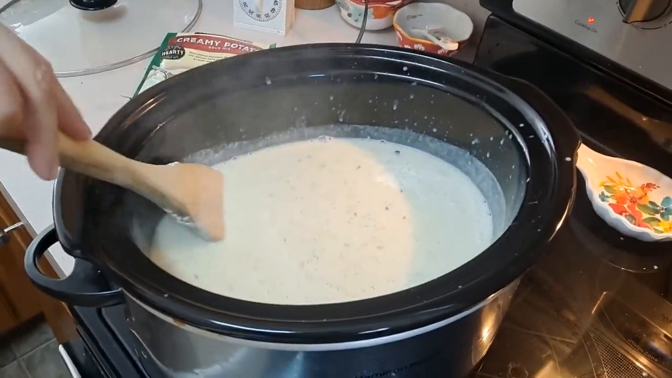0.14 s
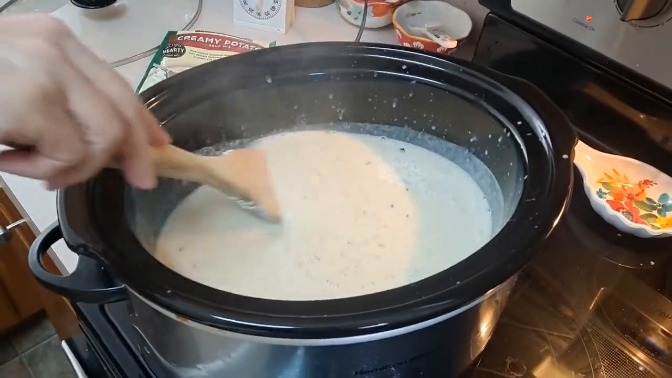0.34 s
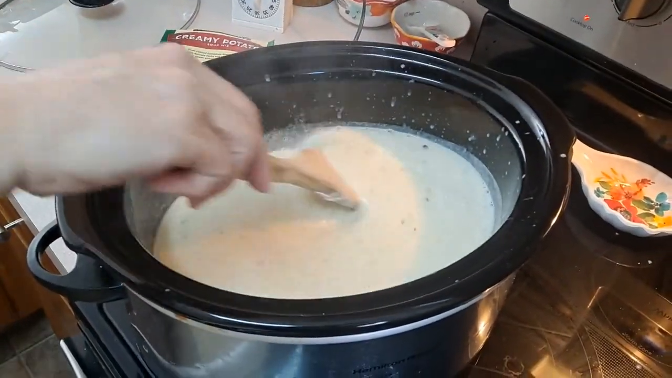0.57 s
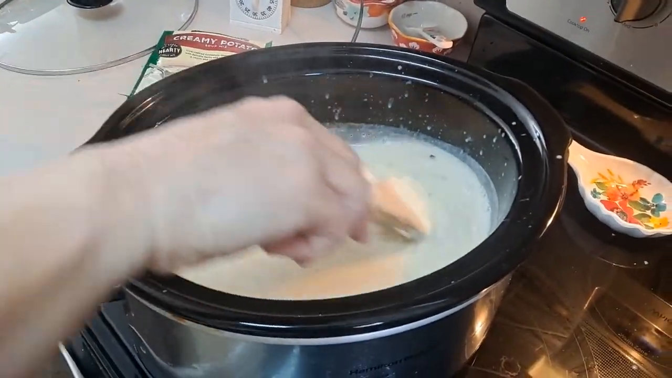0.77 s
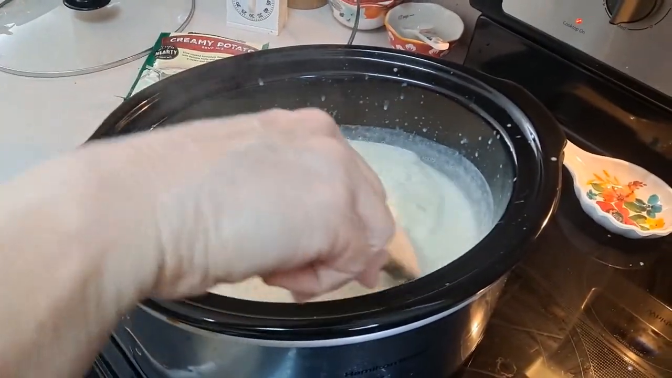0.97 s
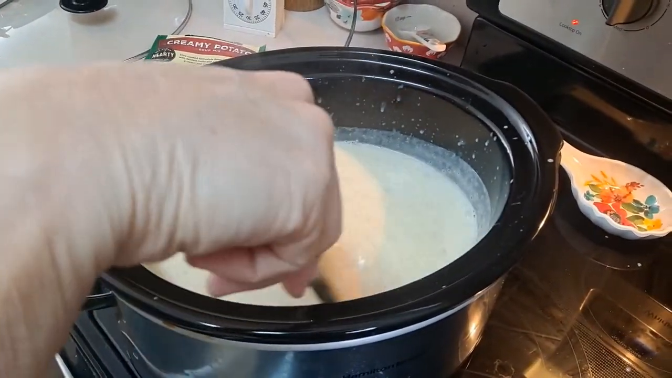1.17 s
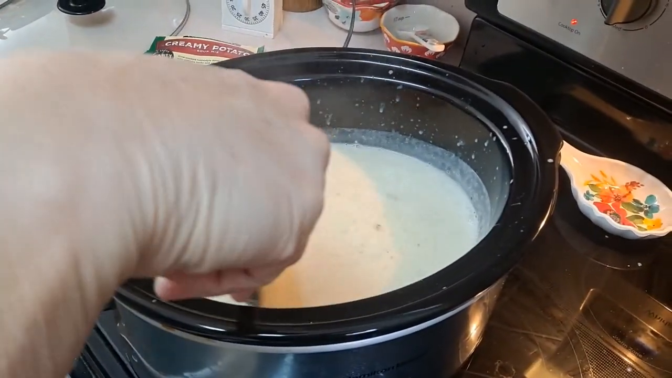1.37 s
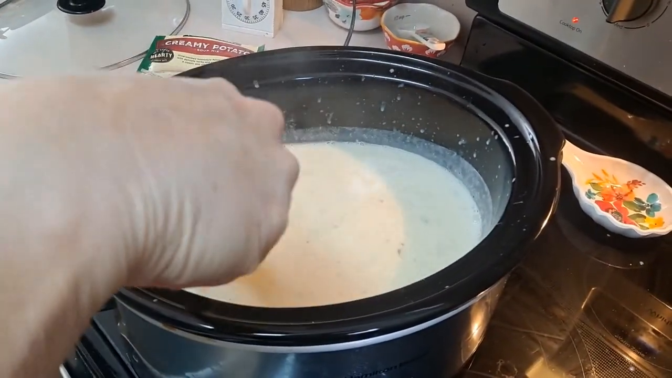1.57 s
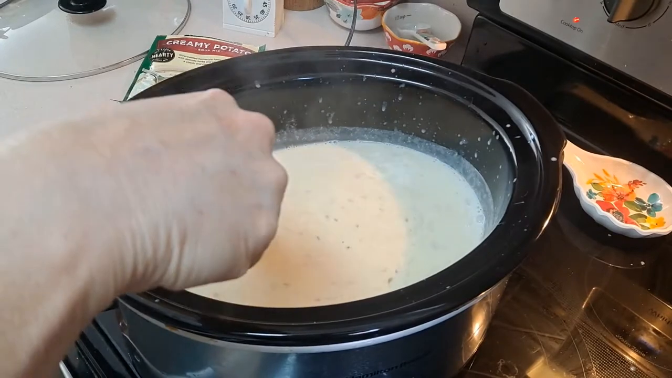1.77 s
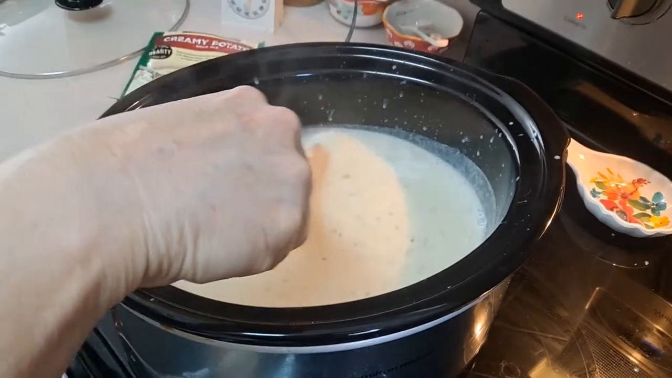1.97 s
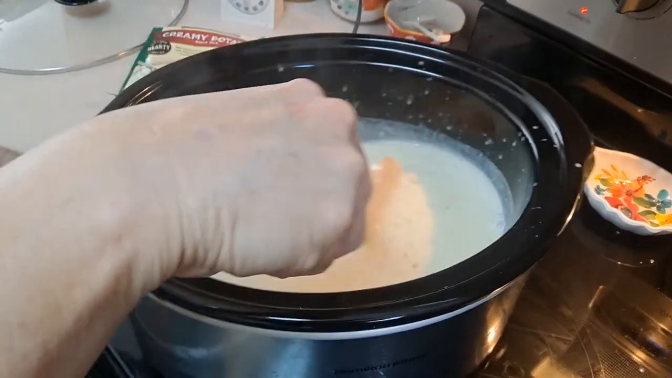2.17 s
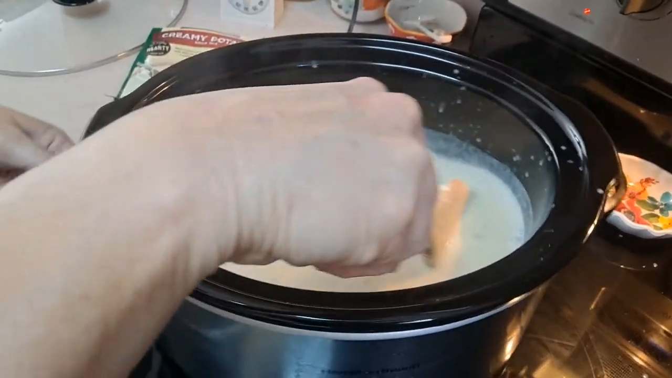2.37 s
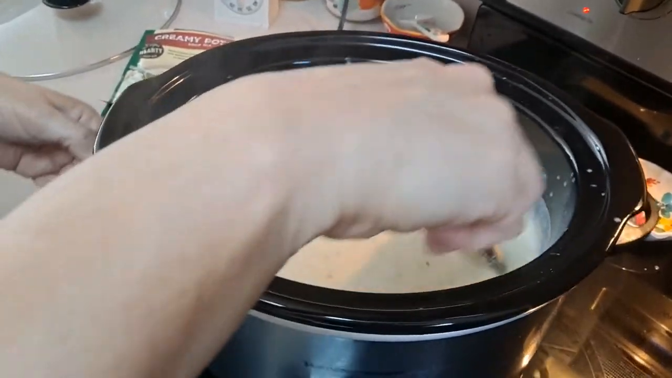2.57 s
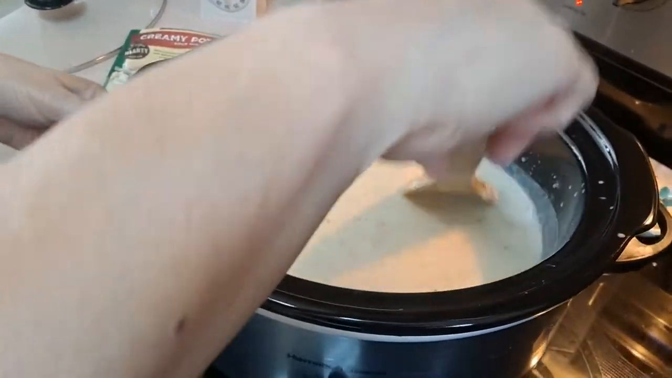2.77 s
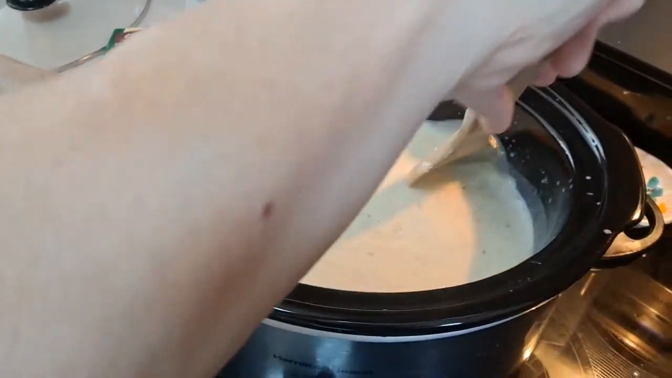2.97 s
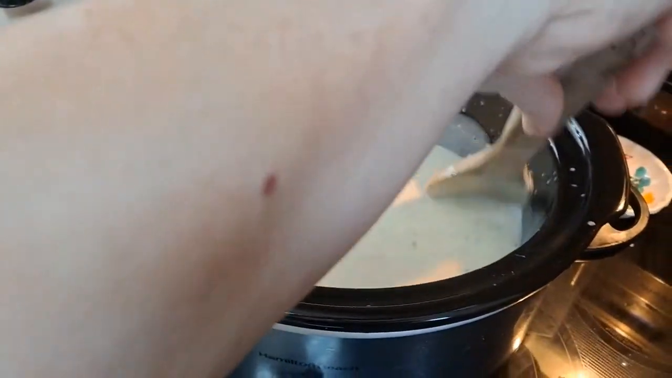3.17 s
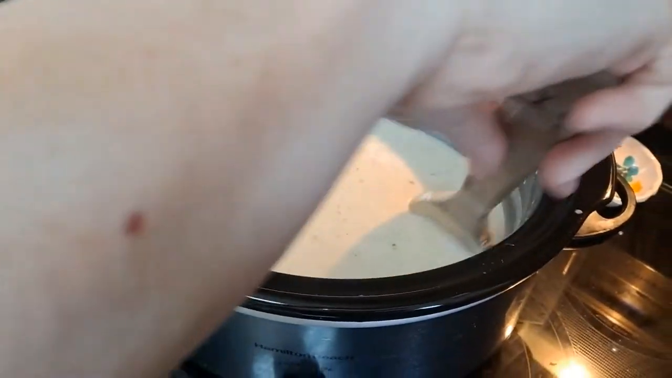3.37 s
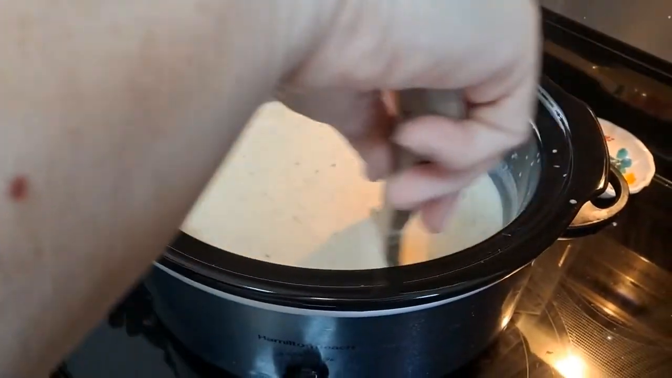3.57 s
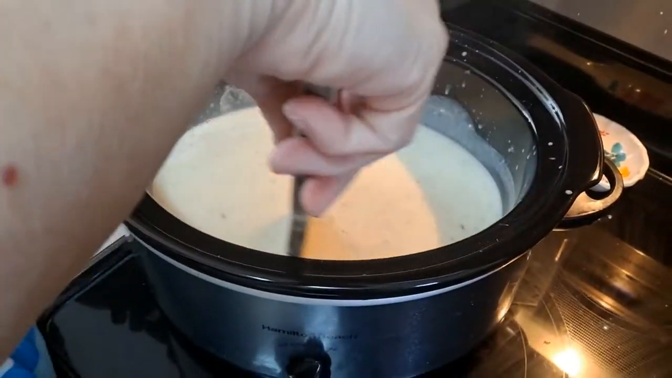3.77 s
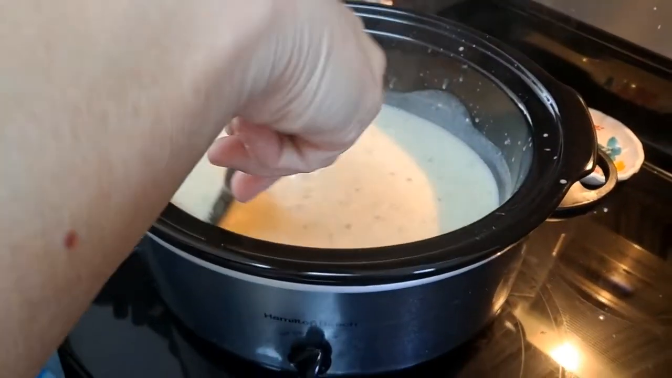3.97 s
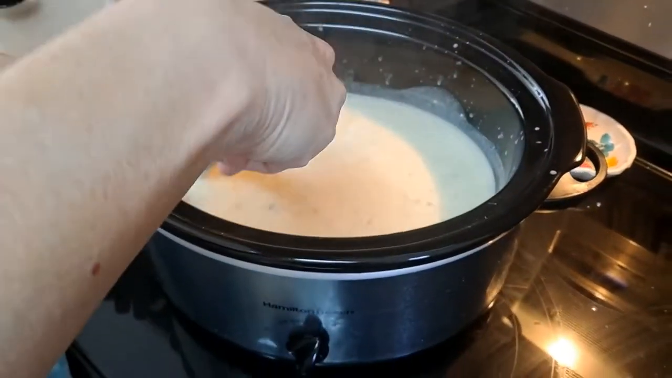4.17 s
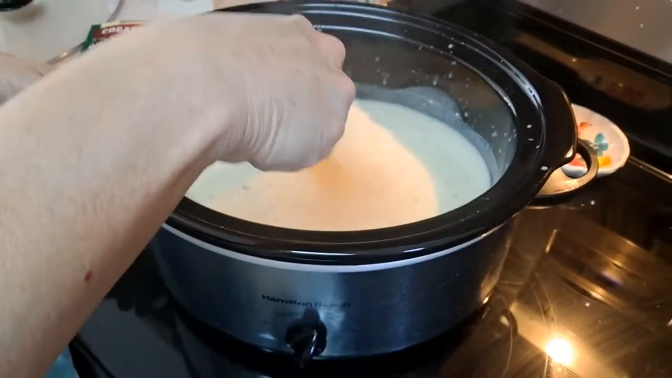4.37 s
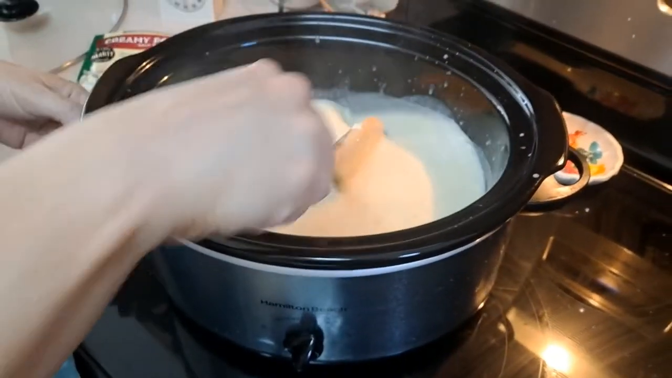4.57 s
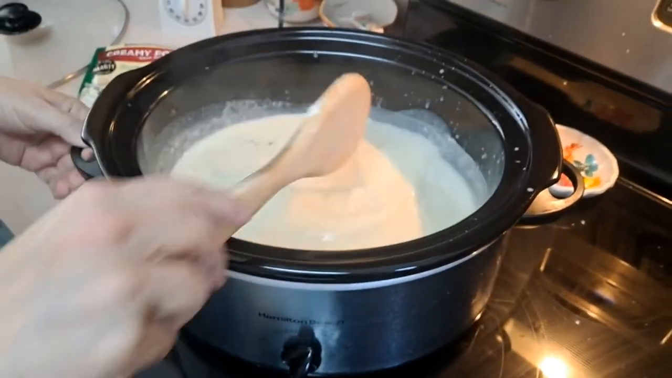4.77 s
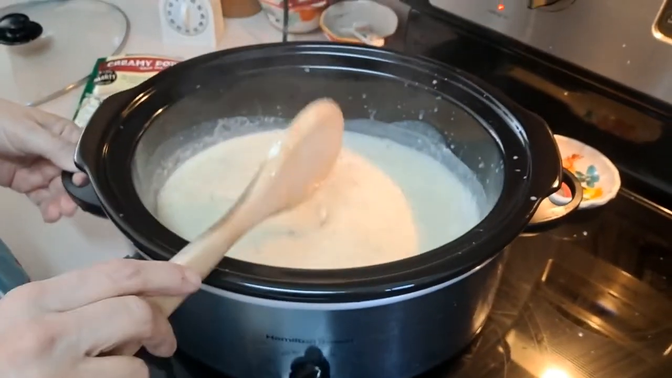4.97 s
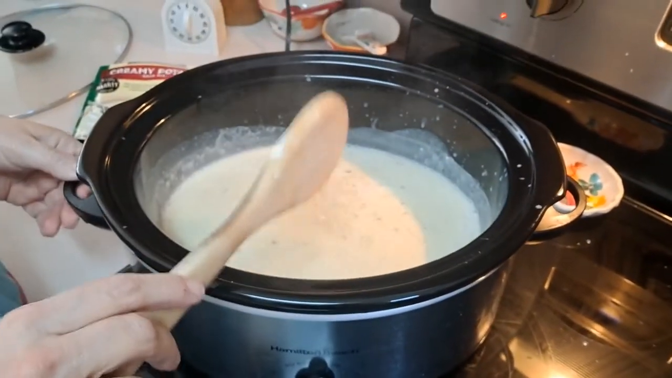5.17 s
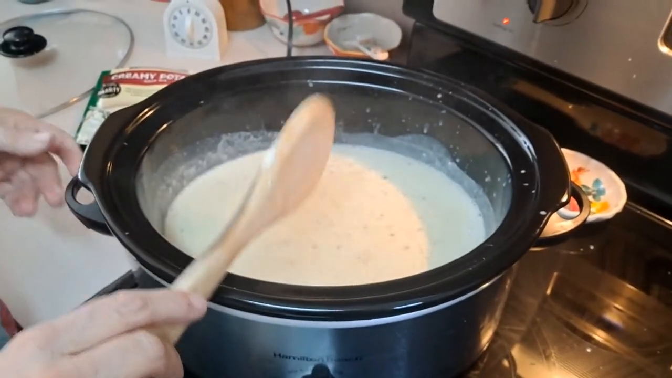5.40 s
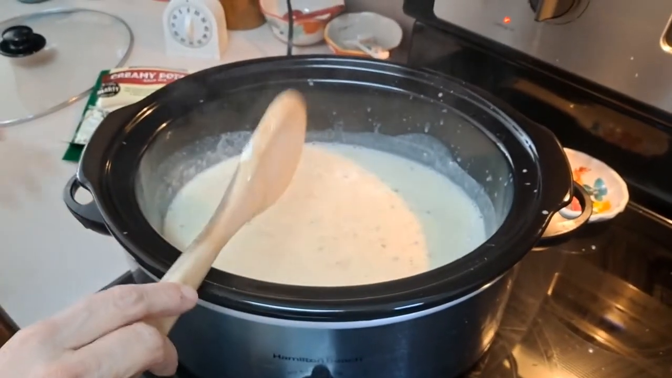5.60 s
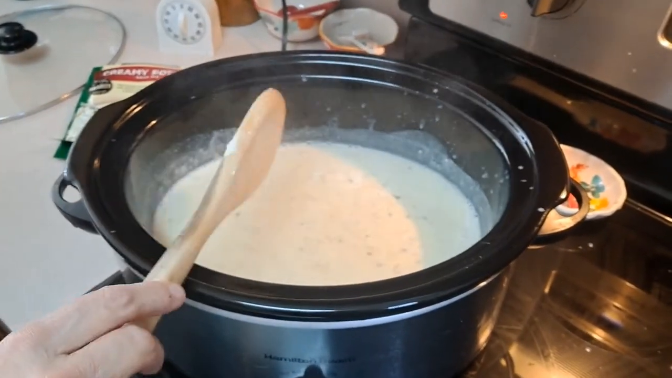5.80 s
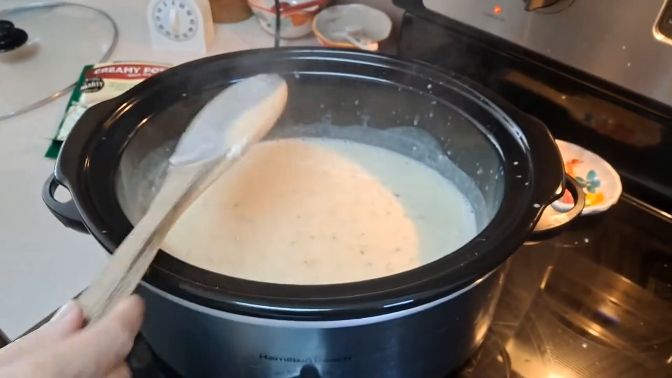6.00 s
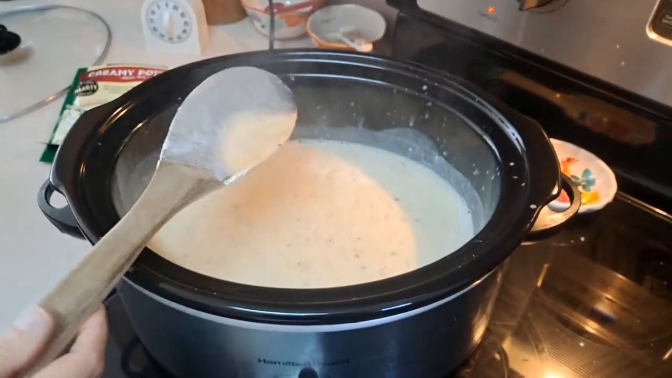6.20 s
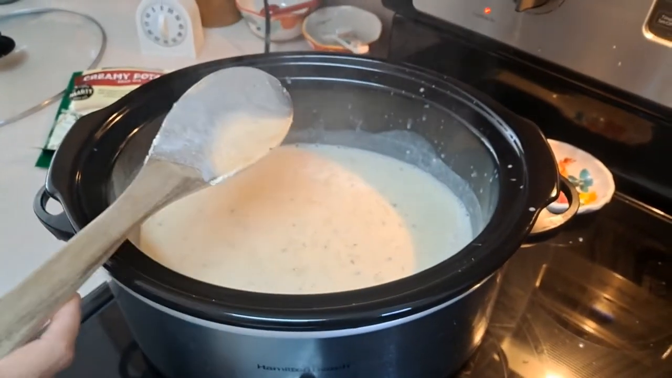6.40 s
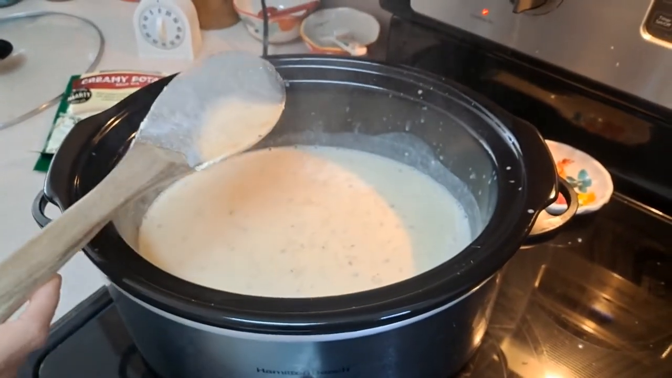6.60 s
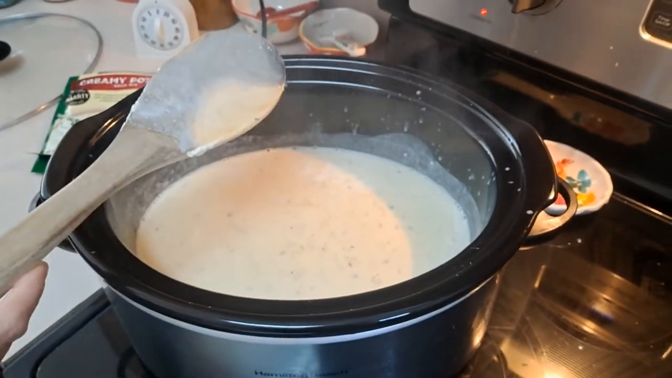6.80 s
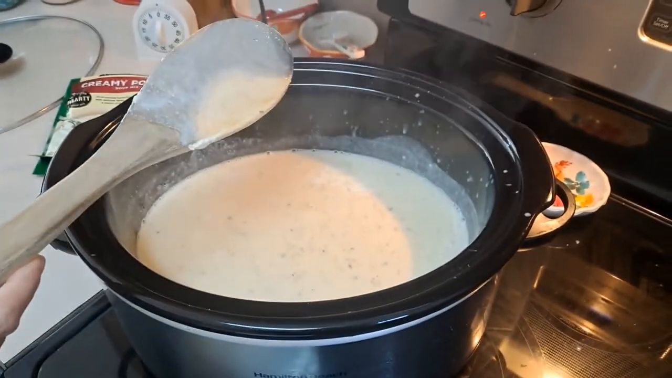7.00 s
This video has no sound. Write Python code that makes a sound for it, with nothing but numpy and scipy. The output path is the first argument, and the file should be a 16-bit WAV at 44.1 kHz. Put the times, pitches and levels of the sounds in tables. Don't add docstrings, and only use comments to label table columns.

```python
import sys
import numpy as np
from scipy import signal
from scipy.fft import rfft, irfft, next_fast_len
from scipy.io import wavfile
from scipy.ndimage import uniform_filter1d

SR = 44100
rng = np.random.default_rng(int(sys.argv[2]) if len(sys.argv) > 2 else 0)


def output_pcm(signal):
    pcm = np.clip(np.atleast_2d(signal).T, -1, 1) * 32767
    wavfile.write(sys.argv[1], SR, np.round(pcm).astype(np.int16))


def elevation(decibels):
    levels = np.asarray(decibels, float)
    return 10 ** (levels / 20)


N = 310905

# (frequency [Hz], level [dB])
FRIDGE_HUM = [(59.2, -64), (118.4, -56), (209.9, -63), (242.2, -74), (296.1, -55), (414.5, -70)]
# (frequency [Hz], density [dB per Hz])
RUMBLE_COLOUR = [(22, -47), (31, -1), (60, -5), (100, -9.5), (145, -16), (210, -6), (265, -18),
                 (420, -19.5), (600, -28.5), (720, -32), (1200, -41.5), (2500, -46.5), (5000, -56),
                 (8000, -90.5)]
# (frequency [Hz], density [dB per Hz])
HISS_COLOUR = [(2350, -26), (4000, -4), (6050, -5.5), (8110, 0.5), (9590, 0), (10800, -5.5), (15100, -2),
               (15800, -13.5)]
# (time [s], held [s], gain [dB], closing [dB/s])
OPENINGS = [
    (0, 0.051, -6, 91.5),
    (.3, 4, 4.5, 14),
    (2.1, 0.43, 7.5, 1),
    (4.95, 1.2, 7.5, 149),
    (6.46, 0.35, 7.5, 106),
]
RUMBLE_DB, HISS_DB = -52, -82
OPENING_DB_S = 198

# (frequency [Hz], t60 [s])
ROOM_T60 = [(60, 0.94), (250, 0.34), (1000, 0.26), (4000, 0.25), (8000, 0.14), (14000, 0.14)]
ROOM_DB, ROOM_GAP_S = -11.5, 0.0039
ROOM_BASS_HZ = 155

# (frequency [Hz], likeness [0-1])
PORT_LIKENESS = [(60, 0.4), (150, 0.99), (350, 0.6), (700, 0.2), (1400, 0)]
# (frequency [Hz], left minus right [dB])
PORT_BALANCE = [(60, -12), (110, -8.5), (200, -0.5), (380, -3.5), (700, -3.5), (1290, -1), (2380, -1),
                (4400, -0.5), (8120, 0), (15000, -2.5)]
BASS_LEAD_RAD, BASS_LEAD_HZ = 0.99, 220
LOW_CUT_HZ, TOP_HZ = 34, 15950

# (time [s], peak level [dB], centre [Hz], width [Hz], push [s])
KNOCKS = [(.119, -24.5, 4000, 4004, 0.0073), (0.512, -53, 3020, 4910, 0.0015),
          (.796, -42, 695, 497, 0.0049), (1.076, -44, 1250, 300, .005), (1.141, -62, 1300, 500, 0.0044),
          (2.897, -27, 1930, 854.4, 0.0022), (2.897, -23.5, 1128, 500, 0.0024),
          (2.898, -30, 646, 400, 0.0035), (2.897, -37, 2790, 700, 0.0033), (3.006, -44, 1560, 2360, 0.026),
          (3.008, -36, 1710, 885, 0.0053), (3.015, -32.5, 147, 270, 0.009), (3.06, -55, 1900, 1400, 0.01),
          (3.511, -51.5, 646, 400, 0.0034), (3.822, -54, 600, 400, 0.0058),
          (4.198, -37.5, 540, 146, 0.0062), (4.2, -38.5, 190, 90, 0.0068), (5.0, -39, 7040, 8940, 0.0091)]
# (time [s], peak level [dB], centre [Hz], width [Hz], push [s])
RUBS = [(3.08, -57.5, 1410, 1200, 0.086), (3.2, -62, 1150, 350, 0.12), (3.45, -66, 615, 344, 0.2),
        (3.72, -63, 600, 355, 0.1), (4.21, -57, 610, 300, 0.043), (6.45, -60.5, 791, 500, 0.059)]
# (frequency [Hz], level [dB], t60 [s])
WALL_MODES = [(620, 16, 0.22), (722, -20, 0.17), (985, -6.5, 0.16), (1200, -7, 0.31), (1500, -8, 0.1),
              (1750, -17, 0.25), (2880, 1, 0.23), (3820, -31, 0.2)]
# (time [s], peak level [dB], centre [Hz])
TICKS = [(1.9994, -61, 9220), (2.8799, -58.5, 9560), (3.0097, -50.5, 9650), (4.2108, -63.5, 14100),
         (4.2394, -66.5, 8820), (4.3575, -61.5, 10870), (4.4922, -61.5, 12440)]
WALL_DB, WALL_DB_PER_DB = -35.5, 4
CLEAR_S = 0.0023

# (full pressure time [s], held [s], level [dB], press-in [dB/s], lift-off [dB/s])
SCRAPES = [
    (2.084, .66, -53.5, 285, 90),
    (2.15, 0.064, -52, 180, 44),
    (2.66, 0.03, -51, 40, 76),
    (3.09, 0.15, -81, 300, 45),
    (4.91, 0.034, -64.5, 153, 402),
]
# (frequency [Hz], width [Hz], level [dB])
GLAZE_MODES = [(813, 92, -12.5), (1200, 24, 0.5), (1380, 36, -13), (1557, 53, -5), (2090, 95, -2.5),
               (2330, 110, 0), (2630, 74, -1.5), (3120, 120, -1.5), (3816, 59, -19.5), (4460, 63, -16),
               (4700, 150, -14.5), (5400, 90, -16)]
# (frequency [Hz], density [dB per Hz])
GRIT_COLOUR = [(350, -41), (600, -12), (811, 2), (1030, -11), (1160, -6.5), (1540, 1), (3800, -12.5),
               (4940, -31), (8360, -120)]
# (frequency [Hz], density [dB per Hz])
BRIGHT_COLOUR = [(2240, -35), (3800, 0.5), (5840, -6), (9080, -8.5), (10500, -26.5), (13000, -17.5),
                 (15500, -27)]
# (time [s], level [dB])
SURGES = [(2.24, -55), (2.65, -58), (2.884, -55), (3.04, -48), (4.94, -58.5)]
BRIGHT_DB, SLOSH_DB = -10.5, 0.5
SURGE_S = .04

# (time [s], peak level [dB], thump [dB], crack [dB], crack tilt above 4 kHz [dB/octave])
TAPS = [
    (4.951, -4, -5, -5.5, -1.4),
    (5.126, -3, -5, -8.5, -1.5),
    (5.29, -3, -4.5, -5, 3),
    (5.458, -6, -3, -5.5, -1.5),
    (5.645, -7.5, -3, -4.5, -1),
    (5.829, -5, -5, -7.5, -3.5),
]
# (frequency [Hz], level [dB], t60 [s], right lag [rad])
RIM_MODES = [(450, -10.5, 0.096, 0.22), (547, -9.5, 0.078, .2), (619.4, -11, 0.11, 0.13),
             (714.4, -5.5, 0.052, 0.53), (1250, -12.5, 0.1, 0.58), (1341, -10.5, 0.12, 1.7),
             (1401, -12, .08, 1), (1622, 0, 0.061, 3.9), (1720, -14, 0.22, 2.2), (1788, -7.5, 0.055, 1.6),
             (1830, -2.5, .1, 1.7), (2179, -7, 0.055, 0.88)]
# (frequency [Hz], level [dB], t60 [s], right lag [rad])
LATE_RIM_MODES = [(1560, -22, .25, 1.6), (1765, -13.5, 0.32, 1.6), (2000, -20.5, .25, 1.1),
                  (2210, -28, 0.2, 1.4), (3310, -27, .12, 1.5), (3967, -20.5, .04, 0.78)]
# (frequency [Hz], level [dB], t60 [s], right lag [rad])
HANDLE_MODES = [(3165, -18, 0.11, 0.95), (3235, -9.5, .03, 3), (4240, -19, .02, 0.85),
                (4730, -19.5, 0.018, 2), (5580, -1.5, 0.018, 1.1)]
# (frequency [Hz], level [dB], t60 [s], right lag [rad])
THUMP_MODES = [(45, -9.5, 0.46, .1), (80, 1, 0.19, .1), (104, -7, 0.24, 0.11), (167.5, -2.5, 0.12, 0.11),
               (251.5, 4.5, 0.097, .1), (318.4, 3, 0.09, .1)]
# (frequency [Hz], density [dB per Hz])
CRACK_COLOUR = [(200, -30.5), (400, -6), (990, -13.5), (1890, -5.5), (2600, -18), (4800, -22), (5800, -18),
                (7000, -25.5), (9500, -30), (11000, -44), (13500, -47), (15800, -58.5)]

# (time [s], level [dB], first blow [dB], clatter [dB], clatter tilt [dB/octave])
BUMPS = [
    (0.0, -10.5, 16.5, -11.5, -7),
    (0.1246, -19.5, 13.5, -11, -3),
    (0.325, -57, -16, 0.5, -8),
    (0.531, -18.5, -0.5, -9, -3.5),
    (0.937, -25, -6, -13.5, -3.5),
    (1.326, -40.5, 2, -17, -1),
]
# (frequency [Hz], level [dB], t60 [s])
FIRST_RING = [(66.7, -2.5, 0.64), (103.8, -.5, 0.37), (81.5, -5, 0.6), (173.2, -13.5, 0.3),
              (278.2, -17, 0.6), (319, -20, 0.37), (400, -21.5, 0.35), (515, -6, 0.201), (636.7, -13, 0.4),
              (2070, -26, 0.23)]
SECOND_RING = [(63.8, -1, 0.46), (106, -1, 0.15), (80, -4, 0.37), (171, -22, 0.2), (261, -14, 0.28),
               (545.5, 0, 0.2), (630, -7, 0.2), (1400, -29, .3), (2045, -25, 0.17)]
FAINT_RING = [(2013, -8, 0.22), (642, -6.5, .15)]
POT_RING = [(105, -7.5, 0.27), (190, -6, 0.41), (255.6, -1.5, 0.41), (366, -5.5, 0.376), (473, -11, 0.12),
            (552, -9.5, .2), (621.4, -1, 0.38), (750, -9.5, .2), (967, -25, 0.25), (1200, -15, 0.24),
            (1645, -19, 0.2), (1990, -13.5, 0.28), (2023, -13.5, 0.43)]
SHELL_RING = [(1997, -8.5, 0.088), (2310, -27, 0.35), (2729, -23.5, 0.082), (3080, -13.5, 0.26),
              (3180, -7.5, 0.051), (3220, -21, 0.22), (4300, -14, 0.068), (5200, -20.5, 0.096),
              (6064, -28, 0.12), (6900, -23.5, 0.043), (9200, -18, 0.042)]
DULL_RING = [(55.7, -0.5, 0.41), (118.5, -8, 0.33), (83, -5.5, 0.32), (178, -7.5, 0.3), (266.7, -17, 0.56),
             (400, -13, 0.17), (510, -8, 0.073), (600, -12, 0.26), (966, -24.5, 0.27), (1204, -20, 0.18),
             (1400, -19.5, .1), (1897, -24.5, 0.2), (2060, -36, 0.12), (4820, -28, 0.12)]
LAST_RING = [(63.7, -16, 0.65), (169.7, 1, 0.18), (297, -11.5, 0.35), (416, -16.5, 0.39),
             (663, -18.5, 0.33), (950, -25, .2), (1200, -16, 0.2), (1400, -21, 0.091), (1976, -19, 0.16),
             (4900, -32, .12)]
BUMP_RINGS = [FIRST_RING, SECOND_RING, FAINT_RING, POT_RING + SHELL_RING, DULL_RING, LAST_RING]
# (frequency [Hz], density [dB per Hz])
CLATTER_COLOUR = [(180, -24.5), (300, -13), (454, -14.5), (563, -26.5), (825, -18), (912, -19.5),
                  (1130, -22), (1250, -21), (4710, -23), (15800, -30.5)]
SOFT_RISE_S, SHARP_BLOW_DB = 0.0096, -2.5
RATTLE_S, BUMP_PAN_DB = 0.058, 5


def on_log(hz, table):
    table = np.array(table)
    return np.interp(np.log(np.maximum(hz, 1)), np.log(table[:, 0]), table[:, 1])


def shaped(x, gain):
    size = next_fast_len(x.shape[-1])
    hz = np.arange(size // 2 + 1) * SR / size
    return irfft(rfft(x, size) * gain(hz), size)[..., :x.shape[-1]]


def unit(x):
    return x / np.sqrt(np.mean(x ** 2))


def pair(size, gain):
    def likeness(hz):
        return np.clip(on_log(hz, PORT_LIKENESS), 0, 1)
    mid, side = rng.standard_normal((2, size))
    mid = shaped(mid, lambda hz: gain(hz) * np.sqrt(1 + likeness(hz)))
    side = shaped(side, lambda hz: gain(hz) * np.sqrt(1 - likeness(hz)))
    return unit(np.array([mid + side, mid - side]))


def colour(table):
    return lambda hz: elevation(on_log(hz, table))


def band(centre_hz, width_hz):
    return lambda hz: 1 / np.sqrt(1 + ((hz - centre_hz ** 2 / np.maximum(hz, 1)) / width_hz) ** 2)


def octaves(x, lowest_hz, count):
    size = next_fast_len(x.shape[1])
    spectrum = rfft(x, size)
    f = np.maximum(np.arange(size // 2 + 1) * SR / size, 1)
    for hz in lowest_hz * 2. ** np.arange(count):
        window = np.cos(np.pi / 2 * np.clip(np.log2(f / hz), -1, 1)) ** 2
        yield hz, irfft(spectrum * window, size)[:, :x.shape[1]]


def walk(rate, size=N):
    steps = rng.standard_normal(int(size * rate / SR) + 2)
    return 1.6 * np.interp(np.arange(size) * rate / SR, np.arange(len(steps)), steps)


def plateau(t, start, held, up_db_s, down_db_s):
    return np.minimum(0, np.minimum(up_db_s * (t - start), down_db_s * (start + held - t)))


def add(out, x, s):
    i = max(int(s * SR), 0)
    out[:, i:i + x.shape[1]] += x[:, :N - i]


def ring(modes, size, shorten=0.59, spread=1.0, rise=0.000087, blur=.012):
    m, t = np.array(modes, float)[:, :, None], np.arange(size) / SR
    hz, db, t60_s = m[:, 0], m[:, 1], m[:, 2]
    if m.shape[1] > 3:
        lag = m[:, 3]
    else:
        lag = spread * rng.standard_normal(hz.shape) * np.minimum(hz / 900, 2)
    fade = elevation(db - 60 * t / (shorten * np.minimum(t60_s, .9))) * (1 - np.exp(-t / rise))
    wander = rng.standard_normal((len(m), size)).cumsum(axis=1)
    start = hz / 37
    start = start + np.sqrt(2 * np.pi * abs(blur) * hz / SR) * wander
    return np.array([(fade * np.sin(2 * np.pi * hz * t + start - side * lag)).sum(0) for side in (0, 1)])


def strike(push, body):
    return signal.fftconvolve(np.atleast_2d(push), body, axes=1)


def kitchen():
    t = np.arange(N) / SR
    out = np.zeros((2, N))
    for hz, db in FRIDGE_HUM:
        level = np.sqrt(2) * elevation(db + 0.51 * walk(5.8))
        out += level * np.sin(2 * np.pi * (hz * t + .015 * walk(1.9)))
    for _, part in octaves(pair(N, colour(RUMBLE_COLOUR)), 39, count=8):
        out += elevation(RUMBLE_DB + 1.2 * walk(5)) * part
    open_db = np.max([db + plateau(t, s, held, OPENING_DB_S, down) for s, held, db, down in OPENINGS], axis=0)
    return out + elevation(HISS_DB + np.maximum(open_db, 0)) * pair(N, colour(HISS_COLOUR))


def room():
    t = np.arange(SR // 2) / SR
    noise = pair(len(t), lambda hz: hz ** 2 / (hz ** 2 + ROOM_BASS_HZ ** 2))
    out = sum(part * elevation(-60 * t / on_log(hz, ROOM_T60)) for hz, part in octaves(noise, 35, count=10))
    out = out * np.clip(t / ROOM_GAP_S - 1, 0, 1)
    return elevation(ROOM_DB) * out / np.sqrt(np.mean(np.sum(out ** 2, 1)))


def wet_ticks():
    out, t = np.zeros((2, N)), np.arange(SR // 50) / SR
    for s, db, hz in TICKS:
        add(out, elevation(db) * pair(len(t), band(hz, 4000)) * np.exp(-t / .0015), s)
    return out


def knocks():
    out, wall = np.zeros((2, N)), ring(WALL_MODES, SR // 10, shorten=0.22)
    hardest_db = max(row[1] for row in KNOCKS)
    for s, db, centre_hz, width_hz, push in KNOCKS + RUBS:
        t = np.arange(SR // 2 if push > .025 else SR // 8) / SR
        blow = pair(len(t), lambda hz: band(centre_hz, width_hz)(hz) ** 2)
        port_phase = np.array([[0], [centre_hz / 1200]])
        blow = blow + CLEAR_S / push * np.sin(2 * np.pi * centre_hz * t + port_phase)
        blow = blow * (1 - np.exp(-t / (0.53 * push))) * np.exp(-t / push)
        blow = blow / np.abs(blow).max()
        add(out, elevation(db) * blow, s)
        wall_db = db + WALL_DB + WALL_DB_PER_DB * (db - hardest_db)
        add(out, elevation(wall_db) * strike(blow[0], wall), s)
    return out


def scrape():
    t = np.arange(N) / SR
    pressure = elevation(np.max([db + plateau(t, s, held, up, down) for s, held, db, up, down in SCRAPES], axis=0))
    surge = sum(elevation(db) * np.exp(-((t - s) / SURGE_S) ** 2) for s, db in SURGES)
    glaze = sum(elevation(db + 2.1 * walk(12)) * pair(N, band(hz, width_hz)) for hz, width_hz, db in GLAZE_MODES)
    grit = elevation(2.0 + 1.3 * walk(25.06)) * pair(N, colour(GRIT_COLOUR))
    body = unit(unit(glaze) + grit)
    bright = elevation(BRIGHT_DB + 1.2 * walk(30)) * pair(N, colour(BRIGHT_COLOUR))
    soup = elevation(1.0 + 0.89 * walk(14)) * pair(N, lambda hz: band(130, 160)(hz) ** 2)
    return pressure * (body + bright) + (elevation(SLOSH_DB) * pressure + surge) * soup


def taps():
    out, t = np.zeros((2, N)), np.arange(SR // 3) / SR
    all_modes = np.array(RIM_MODES + LATE_RIM_MODES + HANDLE_MODES)
    snap = 1.72 * np.exp(-t / 0.0031) + 0.11 * np.exp(-t / 0.0078) + 0.085 * np.exp(-t / 0.044)
    snap = (1 - np.exp(-t / 0.00093)) * snap
    for s, db, thump_db, crack_db, tilt_db in TAPS:
        modes = all_modes + rng.standard_normal(all_modes.shape) * [13.5, 0.5, 0, 1.18]
        tone = ring(modes, SR // 4, rise=0.0026, blur=.011)
        add(out, elevation(db) * tone / np.abs(tone).max(), s)
        thump = ring(THUMP_MODES, SR // 4, rise=0.0036, blur=.004)
        add(out, elevation(db + thump_db - 8.5) * thump, s + 0.0021)
        crack = pair(len(t), lambda hz: colour(CRACK_COLOUR)(hz)
                     * elevation(tilt_db * np.log2(np.maximum(hz / 4000, 1))))
        add(out, elevation(db + crack_db) * snap * crack, s)
    return out


def bumps():
    out, t = np.zeros((2, N)), np.arange(SR // 2) / SR
    pan = elevation(np.array([[BUMP_PAN_DB], [-BUMP_PAN_DB]]) / 2)
    for (s, db, blow_db, clatter_db, tilt_db), modes in zip(BUMPS, BUMP_RINGS):
        rise = SOFT_RISE_S / (1 + elevation(2 * (blow_db - SHARP_BLOW_DB)))
        force = np.exp(-(t / RATTLE_S) ** 2) + 0.17 * np.exp(-t / 0.081)
        force = (1 - np.exp(-(t + 1e-4) / rise)) * force
        contact = rng.exponential(size=len(t) // 90 + 1).repeat(90)[:len(t)]
        chatter = rng.standard_normal(len(t)) * elevation(3.1 * contact ** 0.71)
        blow = elevation(blow_db) * np.exp(-t / 0.00032)
        body = ring(modes, SR // 3, shorten=0.35, rise=0.0011, blur=0.008)
        tone = strike(blow + force * chatter, body) * pan
        add(out, elevation(db) * tone / np.sqrt(np.mean(tone[:, :SR // 10] ** 2)), s)
        clatter = pair(len(t), lambda hz: colour(CLATTER_COLOUR)(hz) * elevation(tilt_db * np.log2(1 + hz / 1000)))
        add(out, elevation(db + clatter_db) * force * clatter, s)
    return out


def scene():
    pot = bumps() + taps() + knocks() + wet_ticks() + scrape()
    echoes = strike(pot[0] + 0.34 * pot[1], room())[:, :N]
    return pot + echoes + kitchen()


def port(side):
    def gain(hz):
        balance = elevation(side * on_log(hz, PORT_BALANCE) / 2)
        lead = np.exp(.5j * side * BASS_LEAD_RAD / (1 + (hz / BASS_LEAD_HZ) ** 2))
        low_cut = hz ** 6 / (hz ** 6 + LOW_CUT_HZ ** 6)
        return balance * lead * low_cut * (hz < TOP_HZ)
    return gain


def follow(peak_db, release_db):
    ramp = release_db * np.arange(len(peak_db)) / SR
    return np.maximum.accumulate(peak_db + ramp) - ramp


def low_pass(x):
    return signal.sosfilt(signal.butter(12, 15850, fs=SR, output="sos"), x)


def record(dry):
    padded = np.pad(dry, ((0, 0), (0, SR // 4)))
    x = np.array([shaped(padded[k], port(side))[:N] for k, side in enumerate((1, -1))])
    ahead = int(.011 * SR)
    peak = np.append(np.abs(x).max(0)[ahead:], np.zeros(ahead))
    peak_db = 20 * np.log10(peak + 1e-9)
    gain_db = -.3 * np.maximum(follow(peak_db, release_db=135.5) + 22.0, 0)
    mix = x * elevation(uniform_filter1d(gain_db, ahead // 2))
    return low_pass(mix)


dry = scene()
out = record(dry)
output_pcm(out)
```